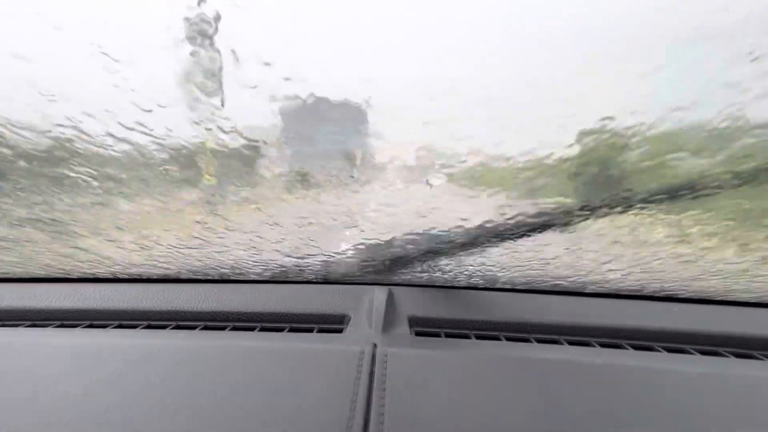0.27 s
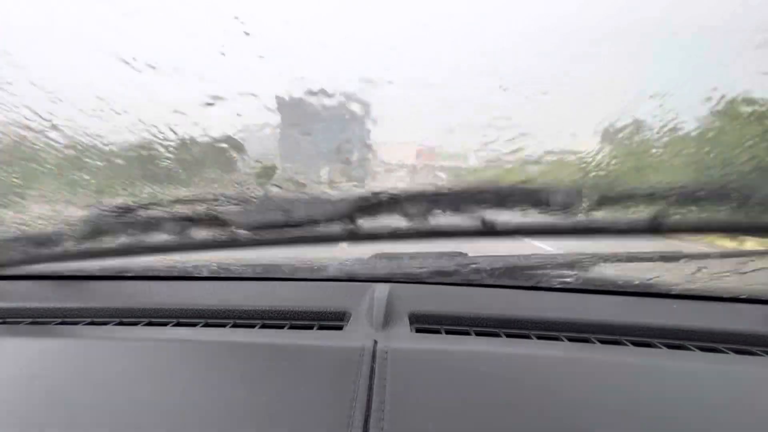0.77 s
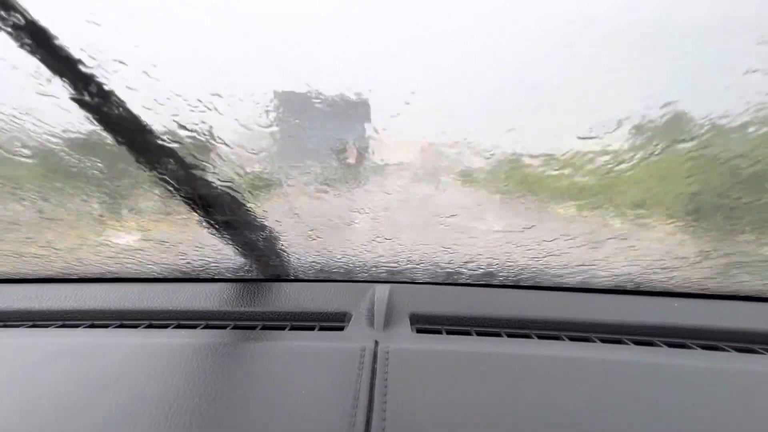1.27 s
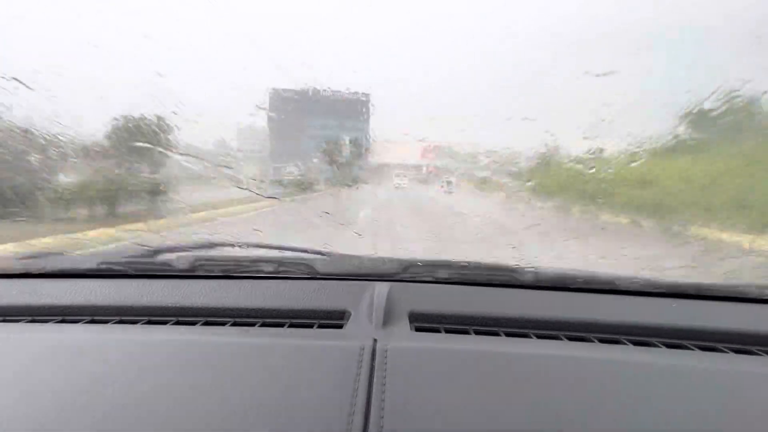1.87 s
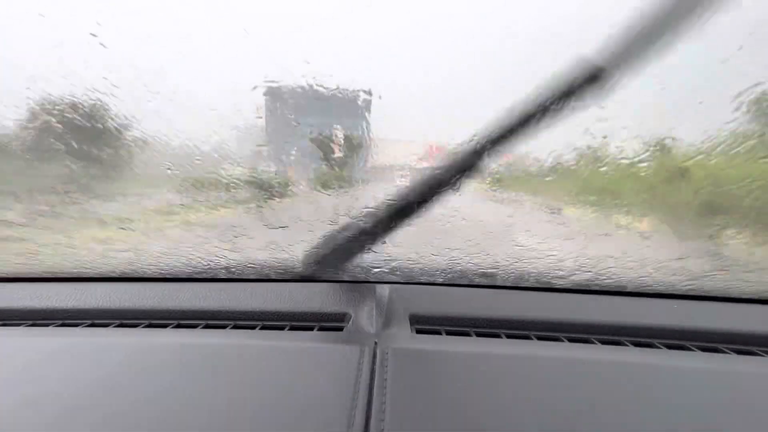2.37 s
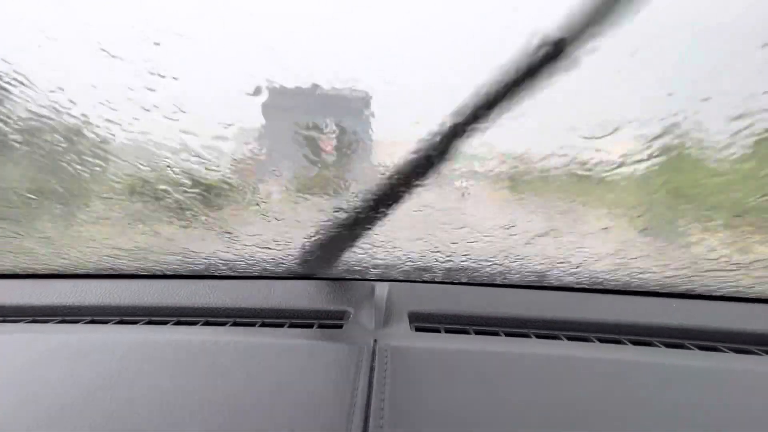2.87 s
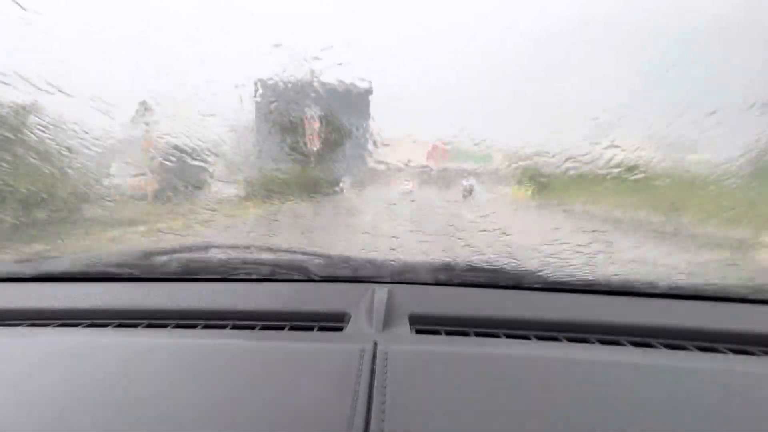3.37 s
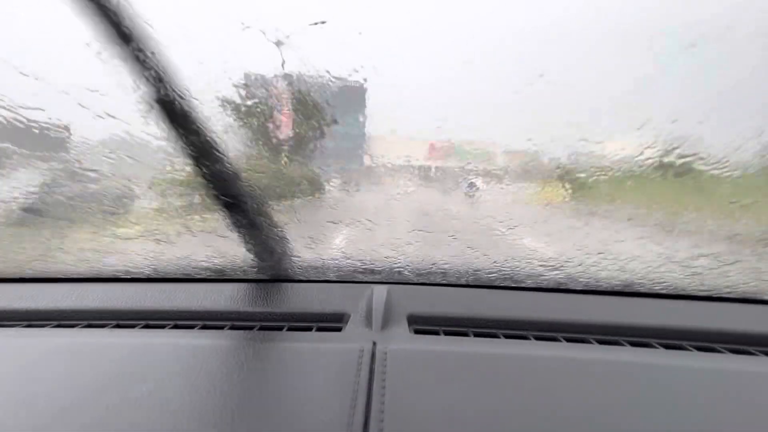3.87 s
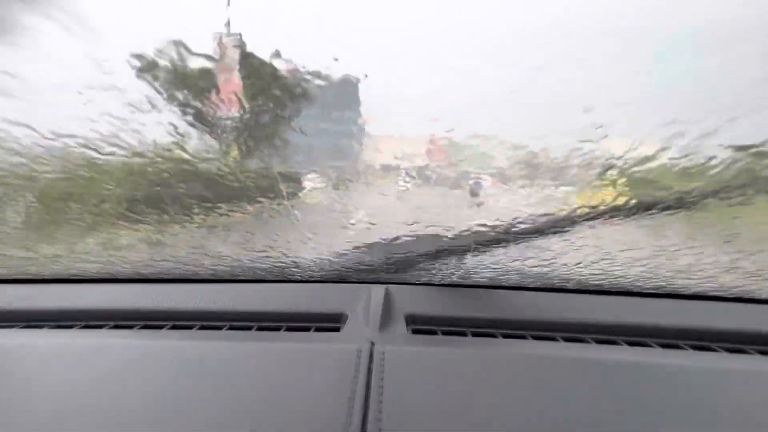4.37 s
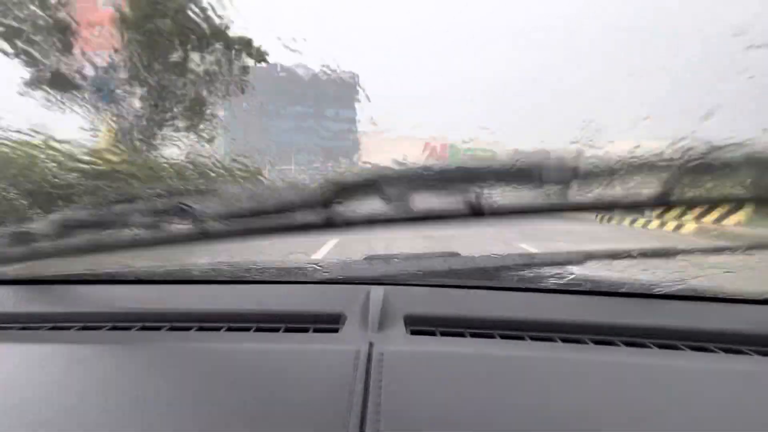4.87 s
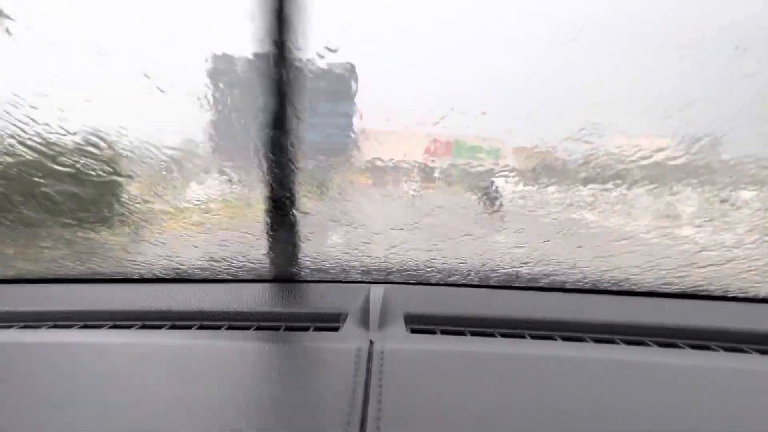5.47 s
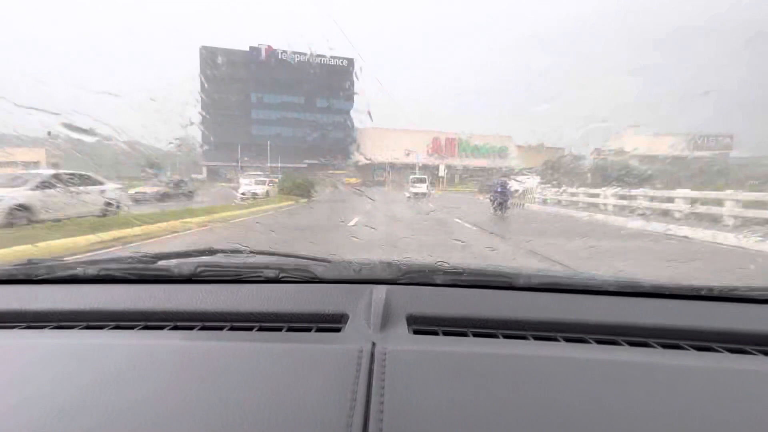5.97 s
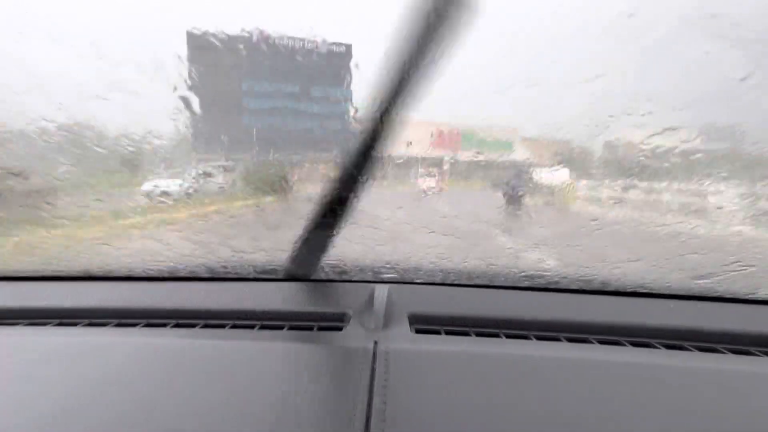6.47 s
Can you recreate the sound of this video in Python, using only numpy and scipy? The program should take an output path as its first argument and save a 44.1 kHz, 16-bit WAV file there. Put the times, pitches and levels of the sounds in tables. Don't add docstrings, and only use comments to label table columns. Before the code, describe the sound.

Dense downpour hisses and patters on glass and roof in a driving car, with booming low road rumble, close drop ticks and faint wiper knocks.

```python
import sys
import numpy as np
from scipy import signal
from scipy.fft import rfft, irfft
from scipy.io import wavfile
from scipy.ndimage import uniform_filter1d

SR = 44100
rng = np.random.default_rng(int(sys.argv[2]) if len(sys.argv) > 2 else 0)


def pcm_store(signal):
    levels = np.round(np.clip(np.atleast_2d(signal), -1, 1) * 32767)
    wavfile.write(sys.argv[1], SR, levels.astype(np.int16).T)


def undo_db(level):
    steps = np.asarray(level, float) / 20
    return 10 ** steps


N = 296352
HZ = np.maximum(np.arange(N // 2 + 1) * SR / N, 1)
LEFT_RIGHT = np.array([[1], [-1]])


def in_time(rows):
    s, *columns = np.transpose(rows)
    return [np.interp(np.arange(N) / SR, s, c) for c in columns]


def at_hz(points):
    hz, value = np.transpose(points)
    return np.interp(np.log(HZ), np.log(hz), value)


def swells(rows, half_s):
    t = np.arange(0, N + 64, 64) / SR
    lift_db = sum(db * np.exp(-((t - s) / half_s) ** 2) for s, db in rows)
    return np.interp(np.arange(N) / SR, t, lift_db)


def fade(x, t60):
    return signal.lfilter([1], [1, -undo_db(-60 / (t60 * SR))], x + 1e-18)


def above(x, hz):
    return signal.sosfilt(signal.butter(2, hz, "high", fs=SR, output="sos"), x)


def mid_rms_one(ports):
    return ports / np.sqrt(np.mean(ports.mean(axis=0) ** 2))


# frequency in Hz, left over right in dB.
TILT = [(30, -3), (60, -2.5), (92, 0), (140, -6), (210, -2.5), (330, -2.5), (500, -1.5), (770, -1.5),
        (1170, -1.5), (1790, -3.5), (2740, -3.5), (4190, -11.5), (6410, -10), (9810, 0)]


def tilt_db():
    return at_hz([*TILT, (10500, 0)]) / 2 * LEFT_RIGHT


# frequency in Hz, left-right likeness from -1 to 1.
LIKENESS = [(25, 0.93), (46, 0.92), (65, 0.99), (115, 0.54), (175, 0.71), (270, 0.61), (420, -0.15),
            (520, -0.44), (940, -0.6), (1080, -0.055), (1230, -0.36), (1380, 0.15), (1550, -0.3),
            (2200, 0.25), (3500, -0.15), (7000, 0.0)]
# frequency in Hz, left-right likeness from -1 to 1.
TOP_LIKENESS = [(7000, 0), (9600, .5), (10500, -.35), (11500, -.5), (12000, -.92), (13500, -.92),
                (14300, 0), (14900, .85)]


def at_ports(pressure, colour_db):
    bass_lag_s, lag_ends_hz = .0005, 300
    mid, side = rfft(pressure * rng.standard_normal((2, N)))
    alike = np.clip(at_hz([*LIKENESS[:-1], *TOP_LIKENESS]), -1, 1)
    lag_s = bass_lag_s / (1 + (HZ / lag_ends_hz) ** 4)
    late = np.exp(-1j * np.pi * HZ * lag_s * LEFT_RIGHT)
    ports = np.sqrt(1 + alike) * mid + np.sqrt(1 - alike) * side * LEFT_RIGHT
    return mid_rms_one(irfft(ports * undo_db(colour_db + tilt_db()) * late, N))


def evened(x, span_s, share):
    power = uniform_filter1d(x.mean(axis=0) ** 2, max(int(span_s * SR), 2)) + .02
    return mid_rms_one(x / power ** (np.clip(share, 0, 1) / 2))


# time in seconds, roughness in dB, extra lengthwise shake in dB.
ROAD = [
    (0, -22.5, -3),
    (.55, -24.5, 4),
    (1.1, -26, 0),
    (1.6, -25, -2),
    (2.5, -23.5, 2),
    (3.0, -19.5, 1),
    (4.1, -17, -0.5),
    (5.0, -18, 2.5),
    (5.9, -22.5, 3.5),
    (6.72, -22, 1),
]
# time in seconds, lift in dB.
PITCH_JOLTS = [(0.13, -10), (0.37, -6), (0.48, 1.5), (0.65, 4.5), (0.93, 1.5), (1.16, -0.5), (1.62, -8),
               (1.75, 3.5), (2.19, 1.5), (2.31, -5), (2.61, -6), (2.82, -3.5), (2.95, 5), (3.32, 6.5),
               (3.87, -17), (4.14, 4), (4.51, 4.5), (4.66, -5), (4.87, -6), (4.98, 2.5), (5.1, -9),
               (5.38, 4), (5.95, -5.5), (6.52, -3.5), (6.71, 9.5)]
# time in seconds, lift in dB.
ROLL_JOLTS = [(0.47, 5), (0.81, -9), (0.96, -2.5), (1.07, -3.0), (1.25, 2), (1.37, -2.5), (2.28, 3.0),
              (2.49, -4), (2.95, 2.5), (3.1, 3), (3.26, -2), (3.53, -5), (3.62, 3), (3.88, 3), (4.36, 3),
              (4.67, -5.0), (4.98, -3.5), (5.22, -2), (5.46, 3), (5.61, 4.5), (5.74, -3), (6.09, 5),
              (6.21, -4.5), (6.4, 5.5)]
# time in seconds, lift in dB.
BODY_JOLTS = [(0.18, 0.5), (0.37, -2.5), (1.59, -3), (2.32, -3.0), (3.87, 1), (4.28, 2.5), (4.85, -2),
              (5.29, -4), (5.43, -1), (5.54, 1.5), (6.09, 2.5), (6.21, -3.0), (6.36, 1), (6.56, -2)]
# frequency in Hz, level in dB per Hz.
LENGTH_MODE = [(12, -38), (22, -25), (30, -16), (38, -17.5), (49, 0), (60, -9.5), (72, -14), (90, -25),
               (180, -90)]
# frequency in Hz, level in dB per Hz.
WIDTH_MODE = [(45, -42), (70, -9.5), (90, 1), (108, 0), (125, -4.5), (150, -16), (190, -31.5), (350, -90)]
# frequency in Hz, level in dB per Hz.
BODY = [(82, -29), (140, -2.5), (157, -5), (194, 1.5), (264, -8), (438, -14), (500, -22), (650, -69),
        (1100, -120)]


def road():
    rough_db, lengthwise_db = in_time(ROAD)
    swing_db = rough_db - rough_db.mean()
    length_db = rough_db + lengthwise_db + 1.41 * swells(PITCH_JOLTS, half_s=0.032)
    width_db = rough_db + 1.2 * swells(ROLL_JOLTS, half_s=0.046)
    body_db = -27 + 0.53 * swing_db + 1.54 * swells(BODY_JOLTS, half_s=0.041)
    length = evened(at_ports(1, at_hz(LENGTH_MODE)), span_s=0.091, share=1.0)
    width = evened(at_ports(1, at_hz(WIDTH_MODE)), span_s=0.062, share=0.27)
    body = evened(at_ports(1, at_hz(BODY)), span_s=0.073, share=0.41)
    return undo_db(length_db) * length + undo_db(width_db) * width + undo_db(body_db) * body


# time in seconds, splash on glass in dB.
RAIN = [(0, -31), (1.0, -30.5), (1.15, -29.5), (1.19, -32), (1.6, -34), (2.6, -31.5), (3.1, -32.5),
        (4.0, -33.5), (5.0, -35), (5.66, -37), (5.72, -38.5), (6.02, -40.5), (6.08, -36), (6.3, -37.5),
        (6.72, -37.5)]
# time in seconds, lift in dB.
GUSTS = [(0.23, -1.5), (0.49, 1), (0.87, -1.5), (1.12, 0), (1.21, -2.0), (1.63, -2.0), (1.89, 2.5),
         (2.0, -3.0), (2.12, 2.5), (2.28, 2.5), (2.44, 1), (2.78, 1.5), (2.98, -2.0), (3.99, 2),
         (4.52, 1.5), (4.75, 2), (5.27, 2.0), (5.66, 1), (5.8, -0.5), (5.98, -2), (6.16, 1.5), (6.46, 1.5)]


def downpour():
    rain_db, = in_time(RAIN)
    swing_db = rain_db - rain_db.mean()
    gust_db = 1.35 * swells(GUSTS, half_s=0.029)
    flutter_span = int(0.049 * SR)
    flutter = uniform_filter1d(rng.standard_normal(N), flutter_span)
    flutter = uniform_filter1d(flutter, flutter_span)
    flutter /= np.sqrt(np.mean(flutter ** 2) + 1e-20)
    splash_db = rain_db + gust_db
    spray_db = 0.51 * swing_db - 0.086 * gust_db + 2 * flutter
    drum_db = -35 + 0.61 * swing_db + 0.52 * gust_db
    return splash_db, spray_db, drum_db


def drops(per_s, spread_db, t60, far):
    size = undo_db(spread_db * np.minimum(rng.exponential(1, N), 5))
    landed = rng.random(N) < per_s / SR
    power = fade(landed * size ** 2, t60 / 2)
    return np.sqrt(power / power.mean() + abs(far))


# frequency in Hz, level in dB per Hz.
ROOF = [(250, -15), (420, -1), (518, -6), (698, -1.5), (893, -8), (1390, -7.5), (1680, -10), (1980, -10),
        (2500, -19.5), (3250, -13), (5500, -120)]
# frequency in Hz, width in Hz, lift in dB.
ROOF_MODES = [(705, 53, 0.5), (835, 32, 3.5), (930, 85, 4), (1220, 25, 6.5), (1406, 210, 2)]


def roof(drum_db):
    modes_db = sum(lift / (1 + (2 * (HZ - hz) / width) ** 2) for hz, width, lift in ROOF_MODES)
    knocks = drops(900, spread_db=4.0, t60=0.056, far=1.6)
    return undo_db(drum_db) * at_ports(knocks, at_hz(ROOF) + modes_db)


# frequency in Hz, level in dB per Hz.
GLASS = [(1500, -19), (2200, -3.5), (2900, -2.5), (3800, 0.5), (5000, -2), (6500, -9), (8000, -11.5),
         (10000, -15), (12000, -19), (14000, -25.5), (16000, -25)]


def glass(splash_db, spray_db):
    splash = at_ports(drops(1200, spread_db=2.5, t60=0.024, far=0.58), at_hz(GLASS))
    spray = above(splash, 6540)
    spray_gain = undo_db(spray_db - np.median(spray_db))
    return undo_db(splash_db + .5) * (splash + (spray_gain - 1) * spray)


# start in seconds, peak in dB, left over right in dB minus 8 (every
# drop leans 8 dB further left than this value).
FAT_DROPS = [(0.1226, -22, 0), (0.2194, -23, -7), (0.5467, -20, -7), (0.629, -27, -2), (0.6494, -27, -5.5),
             (0.8165, -25, -3), (0.9348, -24, -5.5), (1.1533, -23, -6.0), (1.3518, -24, -3.5),
             (1.4287, -24, -2.0), (1.4755, -24, -6.0), (2.6314, -21, 0), (2.675, -21, -4.5),
             (2.7846, -25, -12), (2.8616, -20.5, -7), (3.2071, -23, -3.5), (3.3633, -21.5, -3.0),
             (3.6187, -20, -6), (3.7249, -24, -9), (3.9963, -26, -3.5), (4.0991, -23, -4.5),
             (4.1355, -27, -5.5), (4.1799, -24.5, -3.5), (4.7162, -26, -3.0), (4.8327, -24, -5.0),
             (5.027, -23, -3.0), (5.121, -24, -4.0), (5.3782, -28, -1), (5.5722, -28, -5),
             (5.8616, -29, -12)]


def fat_drops():
    s, peak_db, pan_db = np.transpose(FAT_DROPS)
    hits = np.zeros((2, N))
    hits[:, (s * SR).astype(int)] = undo_db(peak_db - 3.5 + (pan_db + 8.0) / 2 * LEFT_RIGHT)
    burst = fade(hits, t60=0.031) * rng.standard_normal((2, N))
    colour_db = at_hz([(1200, -25), (3000, -6), (6000, 6.0), (10000, 0), (13000, -10.0), (16000, -9)])
    return irfft(rfft(burst) * undo_db(colour_db + tilt_db()), N)


# start in seconds, peak in dB.
TICKS = [(0.628, -28), (0.8165, -30), (1.4311, -29), (1.4731, -29), (3.2071, -33), (3.3638, -32),
         (3.6187, -24), (3.9968, -32), (4.135, -32), (4.1799, -33), (4.5246, -37), (4.79, -30),
         (4.8339, -38), (5.027, -27), (5.0704, -35), (5.1208, -33), (5.3782, -30), (5.6895, -35),
         (5.8616, -34)]


def ticks():
    s, peak_db = np.transpose(TICKS)
    hits = np.zeros(N)
    hits[(s * SR).astype(int)] = undo_db(peak_db + 0.5)
    shared = rng.standard_normal(N)
    own = .5 * rng.standard_normal((2, N))
    return above(fade(hits, t60=0.0075) * (shared + own), 7000)


# start in seconds, peak in dB, pitch in Hz.
WIPER_KNOCKS = [
    (4.716, -29, 705),
    (4.961, -23, 790),
    (6.366, -28, 720),
]


def wiper():
    out = np.zeros(N)
    for s, peak_db, hz in WIPER_KNOCKS:
        start = int(s * SR)
        t = np.arange(N - start) / SR
        out[start:] += undo_db(peak_db - 1.5 - 60 * t / 0.052) * np.sin(2 * np.pi * hz * t)
    return out * undo_db(-1.5 * LEFT_RIGHT)


def scene():
    splash_db, spray_db, drum_db = downpour()
    rain = roof(drum_db) + glass(splash_db, spray_db)
    return road() + rain + fat_drops() + ticks() + wiper()


def low_pass(x):
    return signal.sosfilt(signal.butter(12, 15800, fs=SR, output="sos"), x)


def record(dry):
    limited = 1.615 * np.tanh(dry / 1.575)
    return low_pass(limited)


dry = scene()
out = record(dry)
pcm_store(out)
```